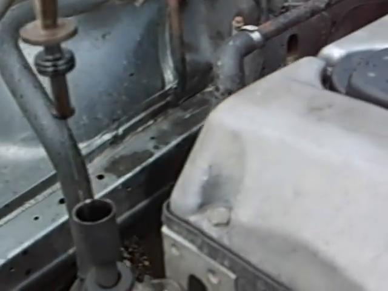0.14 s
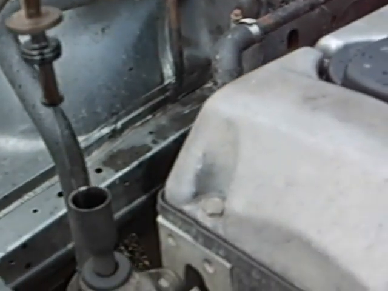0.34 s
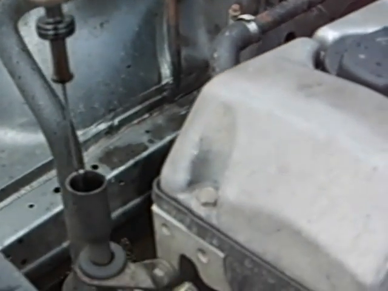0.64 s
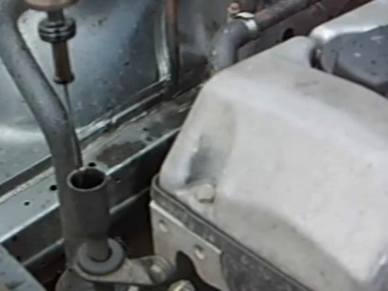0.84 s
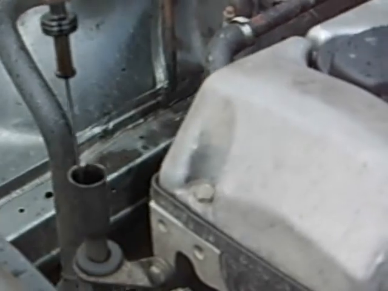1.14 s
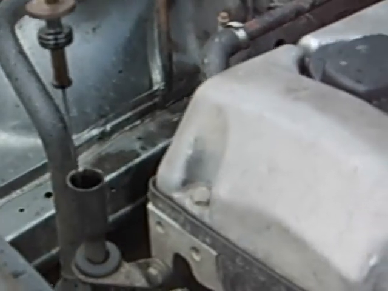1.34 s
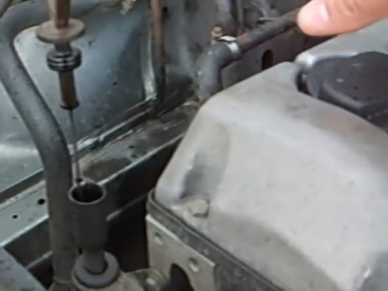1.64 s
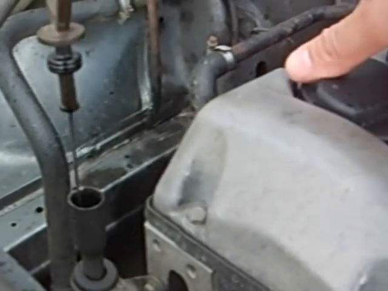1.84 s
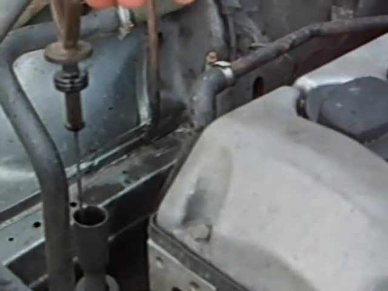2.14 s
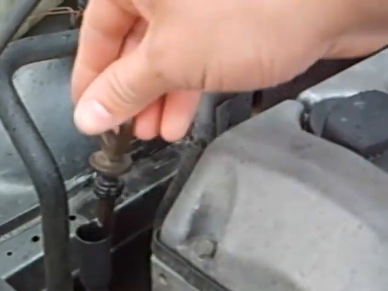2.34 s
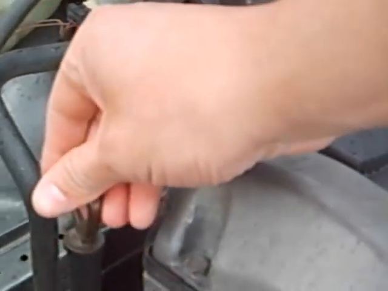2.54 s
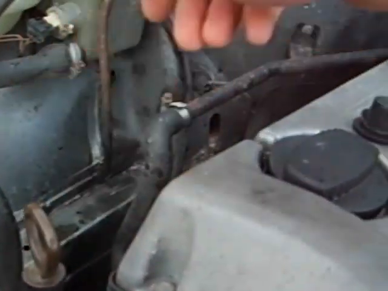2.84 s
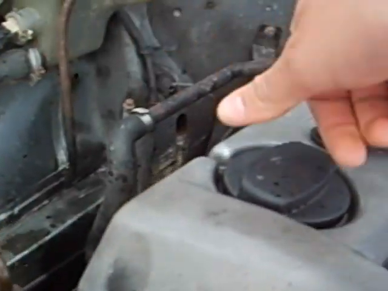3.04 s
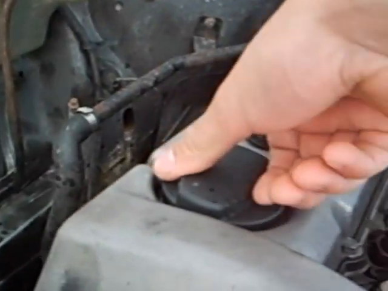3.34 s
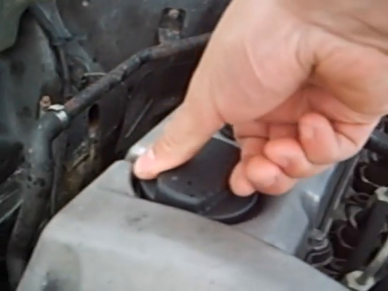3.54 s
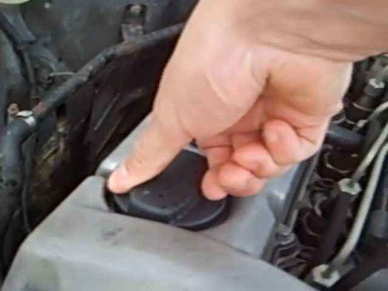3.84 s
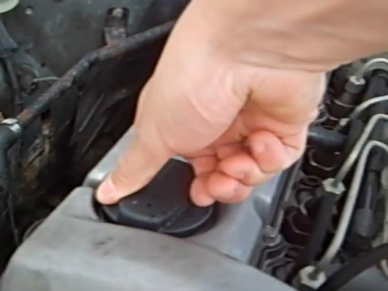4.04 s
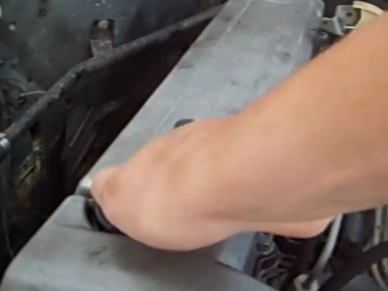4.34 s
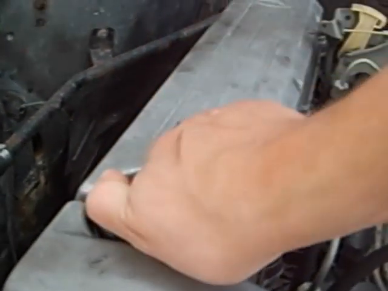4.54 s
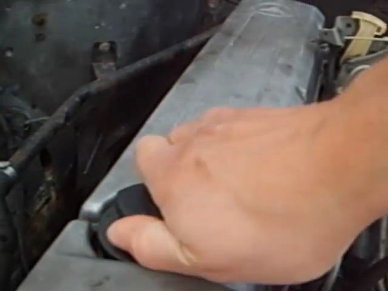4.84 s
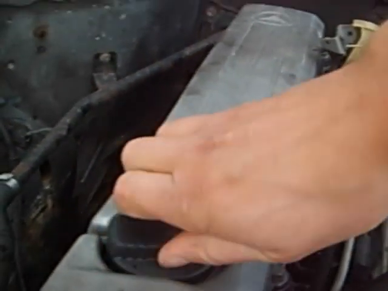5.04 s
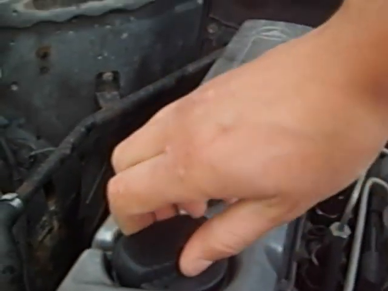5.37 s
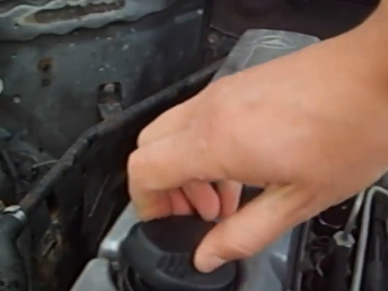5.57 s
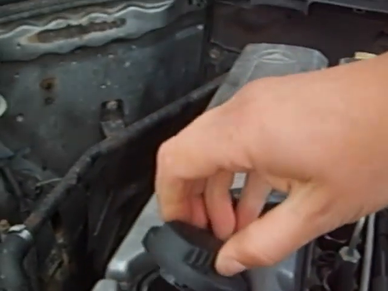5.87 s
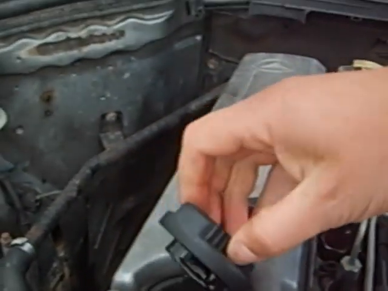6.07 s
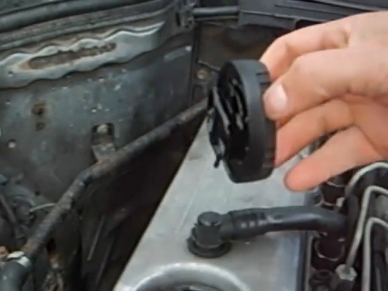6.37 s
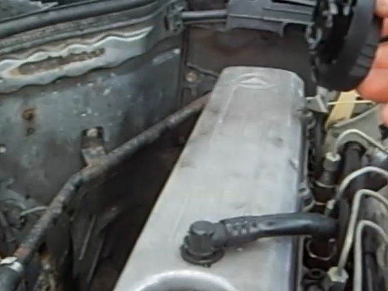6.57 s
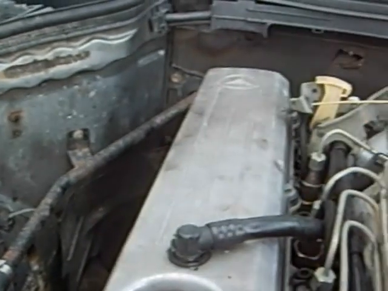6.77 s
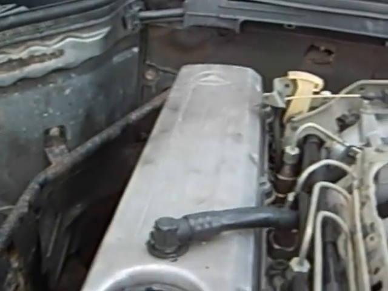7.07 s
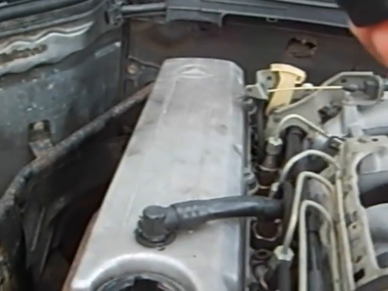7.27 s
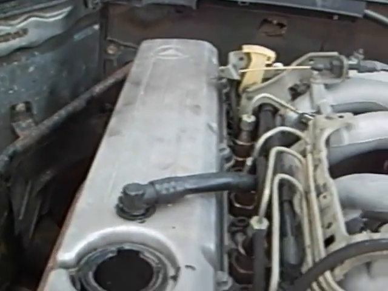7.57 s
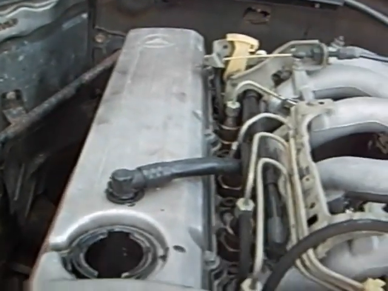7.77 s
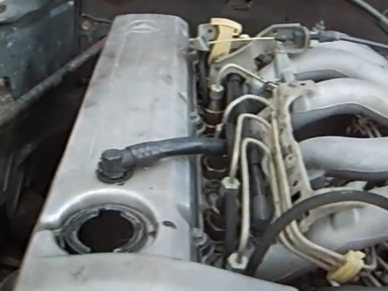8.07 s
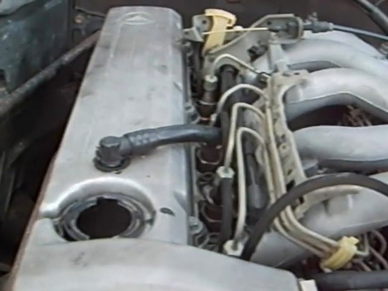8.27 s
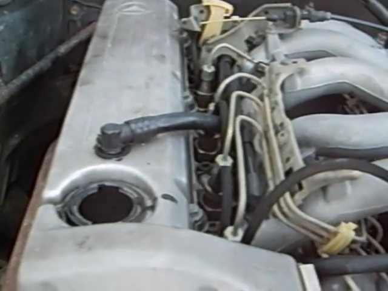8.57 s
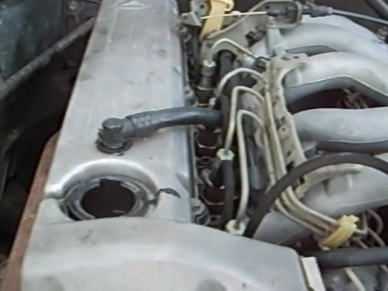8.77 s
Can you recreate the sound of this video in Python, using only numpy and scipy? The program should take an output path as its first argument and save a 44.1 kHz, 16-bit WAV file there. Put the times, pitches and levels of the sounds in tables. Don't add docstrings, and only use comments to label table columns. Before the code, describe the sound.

Close and dry in an open engine bay, a five-cylinder diesel starts at high speed. A first throttle blip swells to a peak near 0.35 s, sags, and a shorter second one peaks around 1.0 s: a loud, dense roar with metallic clatter, bright sizzle and overload grit. From about 1.2 to 2.7 s it runs down without fuel, pitch sliding steadily lower and noise thinning into separate pulses. Gritty steel scrapes of a dipstick come at 2.2-2.5 s, with a seating scrape at 2.6 s. At 2.75 s the engine catches, dips slow with one weak firing, then steadies near 28 firings a second by 3.5 s. Crisp uneven cracks, ticking valves, piston knock and low block throb continue to about 9 s. Around 4.4 s a narrow hollow hum grows as the hand turns the cap; after 6.3 s the cap is off and the cylinder balance shifts slightly. Fan air rumbles softly throughout.

```python
import sys
import numpy as np
from scipy import signal
from scipy.fft import rfft, irfft, next_fast_len
from scipy.io import wavfile
from scipy.ndimage import uniform_filter1d

SR = 44100
rng = np.random.default_rng(int(sys.argv[2]) if len(sys.argv) > 2 else 0)


def volts(x):
    e = np.asarray(x, float) / 20
    return 10 ** e


def to_wav(sig):
    pcm = np.clip(np.atleast_2d(sig), -1, 1) * 32767
    pcm = np.round(pcm).astype(np.int16)
    wavfile.write(sys.argv[1], SR, pcm.T)


N = 392931
CYLINDERS = 5
CATCH_S = 2.7507
IDLE_RATE = 28.0205


def unit(x):
    return x / np.sqrt(np.mean(x ** 2) + 1e-20)


def along(points, hz):
    f, v = np.transpose(points)
    return np.interp(np.log(hz + 1), np.log(f + 1), v)


def curves(rows):
    s, *cols = np.transpose(rows)
    return np.array([np.interp(np.arange(N) / SR, s, c) for c in cols])


def by_speed(rows, rate):
    speed, *cols = np.transpose(rows)
    return np.array([np.interp(rate, speed, c) for c in cols])


def ramp(start_s, length_s):
    return np.clip((np.arange(N) / SR - start_s) / length_s, 0, 1)


def wobble(rate):
    knots = rng.standard_normal(int(N * rate / SR) + 2)
    return np.interp(np.arange(N) * rate / SR, np.arange(len(knots)), knots)


def filtered(x, response):
    m = next_fast_len(N + 8192)
    return irfft(rfft(x, m) * response(np.fft.rfftfreq(m, 1 / SR)), m)[..., :N]


def scatter(starts, sounds):
    where = starts[:, None] + np.arange(sounds.shape[1])
    return np.bincount(where.ravel(), sounds.ravel(), N + SR)[:N]


# start_s, firings_per_s
CRANK_SPEED = [(0, 114.6), (.13, 109.5), (.31, 133.5), (.38, 135.3), (.6, 120.3), (.72, 114.5),
               (.86, 108.8), (1.02, 129.6), (1.16, 121.4), (1.5, 100.3), (1.95, 77.6), (2.42, 52.25),
               (2.75, 35.5)]


def crank():
    after = np.arange(N) / SR - CATCH_S
    swing = 11.505 * np.exp(-np.abs(after) / .2541) * np.cos(2 * np.pi * .61426 * after + .8388)
    free = uniform_filter1d(curves(CRANK_SPEED)[0], size=1323)
    rate = np.where(after < 0, free, IDLE_RATE + swing)
    count = np.cumsum(rate) / SR
    return rate, count - count[round(CATCH_S * SR)]


def firings(count, every=1, late=0):
    number = np.arange(np.ceil(count[0] / every), (count[-1] - late) // every + 1).astype(int)
    return np.interp(number * every + late, count, np.arange(N)).astype(int), number


# open_s, held_s
BLIPS = [
    (.02, 0.34),
    (.77, 0.22),
]


def throttle():
    return sum(ramp(s, .032) - ramp(s + held, .09) for s, held in BLIPS)


# pitch_hz, t60_s, level_db
HEAD_MODES = [(6050, .036, 0), (6500, .03, -3), (7000, .03, -1), (7500, .03, -1), (8250, .028, -2),
              (8900, .025, -2), (9430, .028, -1), (10200, .028, -1), (11800, .025, -4)]
# freq_hz, level_db (per Hz)
CRACK_COLOUR = [(2500, -54), (3600, -28), (4300, -13), (5500, -6.5), (5950, -6), (7500, -4), (9000, -4),
                (10400, -9), (10800, -12), (11900, -16.5), (12600, -15), (13600, -33), (14400, -62),
                (15000, -120)]


def combustion(count, free_db, idle_db):
    at, number = firings(count)
    cylinder = number % CYLINDERS
    t = np.arange(SR // 25) / SR
    luck = rng.standard_normal((len(at), 3 + 2 * len(HEAD_MODES)))
    misfire_db = -14 * (number == 2)
    db = np.where(count[at] < -.5, free_db[at], idle_db[cylinder, at] + misfire_db) + .5 * luck[:, 0]

    burn_s = .0055 * volts(1.5 * luck[:, 1:2])
    bay_answer = .4 * volts(-60 * t / .07)
    shape = (1 - np.exp(-t / .0011)) * (np.exp(-(t / burn_s) ** 2) + bay_answer)
    bursts = volts(2.7 * unit(uniform_filter1d(rng.standard_normal((len(at), len(t))), size=30)))
    sound = shape * bursts * rng.standard_normal(bursts.shape)

    own_db = 1.5 * rng.standard_normal((CYLINDERS, len(HEAD_MODES)))
    for k, (hz, t60, mode_db) in enumerate(HEAD_MODES):
        level = volts(mode_db - 2 + own_db[cylinder, k] + 2.5 * luck[:, 3 + 2 * k])[:, None]
        pitch = hz * (1 + .011 * luck[:, 4 + 2 * k])[:, None]
        ring = np.sin(2 * np.pi * pitch * t) * volts(-60 * t / t60)
        sound += level * ring * (1 - np.exp(-t / .0016))
    sound /= np.sqrt(np.mean(sound[:, :420] ** 2, axis=1, keepdims=True))

    early_or_late_s = .0004 * luck[:, 2] - .0006
    start = np.maximum(at + (SR * early_or_late_s).astype(int), 0)
    cracks = scatter(start, volts(db + 2)[:, None] * sound)
    return filtered(cracks, lambda hz: volts(along(CRACK_COLOUR, hz)))


# firings_per_s, order_1_db, order_2_db, order_3_db, order_4_db (rms)
PIPES = [(28, -60, -58, -58.5, -63.5), (43, -46, -44, -53, -56), (52.4, -44, -52, -37, -48),
         (64, -46, -44, -40, -41), (77.6, -39, -45, -31.5, -47), (90, -41, -34.5, -33.5, -36),
         (96, -54, -36, -47, -55), (102.3, -39, -28, -50, -46), (110, -43, -20, -47, -29),
         (123.4, -38, -29, -29.5, -26.5), (128, -39, -22.5, -29.5, -24), (136, -48, -22, -31, -39)]
BLIP_ORDERS_DB = (6, -1, 1, -2)
# freq_hz, level_db (rms of an order)
BAY_COLOUR = [(140, -55), (200, -52), (280, -52), (400, -55), (490, -47.5), (560, -44), (600, -49),
              (700, -54)]


def order_levels(rate, boom_db, gap_hz):
    bay_orders = range(5, 26)
    pipe_db = by_speed(PIPES, rate) + np.outer(BLIP_ORDERS_DB, throttle())
    quiet_db = -30 * (1 - ramp(2.88, .41))
    gap_db = 14 * ramp(4.35, .33)
    bay_db = []
    for hz in IDLE_RATE * np.array(bay_orders):
        boom = boom_db / (1 + (250 / hz) ** 2)
        gap = gap_db / (1 + (2 * (hz - gap_hz) / 24) ** 2)
        bay_db.append(along(BAY_COLOUR, hz) + boom + quiet_db + 2 * wobble(1.23) + gap)
    return [*zip(range(1, 1 + len(pipe_db)), pipe_db), *zip(bay_orders, bay_db)]


# freq_hz, level_db (per Hz)
BLOCK_COLOUR = [(40, -45), (70, -18), (115, -17), (160, -10.5), (240, -12), (330, -7), (420, -6), (560, -5),
                (780, -6.5), (1100, -6), (1500, -42)]


def block(rate, count, thud_db, orders):
    at, number = firings(count)
    t = np.arange(SR // 8) / SR
    answer = rng.standard_normal((CYLINDERS, len(t)))
    answer -= .6 * answer.mean(0)
    answer *= (1 - np.exp(-(t / .0074) ** 2)) * volts(-60 * t / .22)
    kicks = np.zeros((CYLINDERS, N))
    kicks[number % CYLINDERS, at] = volts(.86 * rng.standard_normal(len(at))) / np.sqrt(rate[at])
    thud = unit(signal.oaconvolve(kicks * np.sqrt(28), answer, axes=1)[:, :N].sum(0))
    loose = .59 * rng.standard_normal(N) * volts(2.8 * np.cos(2 * np.pi * (count - .45)))
    total = volts(thud_db + .5) * unit(filtered(thud + loose, lambda hz: volts(along(BLOCK_COLOUR, hz))))
    for k, db in orders:
        level = np.sqrt(2) * volts(db + 1 + wobble(12))
        waver = rng.normal(0, 11 / k) + .25 * wobble(2)
        total = total + level * np.cos(2 * np.pi * k * (count - .37) + waver)
    return total


# freq_hz, level_db (per Hz)
GEAR_FAST = [(180, -38), (300, -5), (700, -4.5), (1200, -2.5), (1940, -4.5), (2630, -6), (5560, -7.5),
             (9270, -15), (11000, -26.5), (13600, -42)]
GEAR_IDLE = [(180, -38), (300, -11), (550, -4), (807, -3), (1430, 5), (1850, 1), (3620, -4), (5650, -3.5),
             (6120, -3.5), (8030, -9.5), (9730, -14), (12600, -32), (13600, -33)]
# pitch_hz, width_hz, level_db
COVER_FAST = [(478, 80, -3), (614, 50, 2), (752, 60, 1), (1230, 250, -13), (1910, 110, -2.5),
              (5740, 540, -14.5), (7190, 200, -3)]
COVER_IDLE = [(574, 80, -6), (1440, 110, -16), (2243, 20, -8), (3400, 69, -31)]


def gear(rate, count, clatter_db, sizzle_db):
    fast = np.clip((rate - 32) / 30, 0, 1)
    turn = (count % 1) * (1 - .67 * fast)

    def grit(shake_db):
        uneven_db = .5 * wobble(900) + .3 * wobble(6.7) + .93 * wobble(90)
        return rng.standard_normal(N) * volts(uneven_db - shake_db * turn)

    def colour(spectrum, peaks, hz):
        bumps = sum(volts(db) / (1 + (2 * (hz - c) / w) ** 2) for c, w, db in peaks)
        band = (hz < 13700) / (1 + (650 / (hz + 1)) ** 3)
        return volts(along(spectrum, hz)) * (1 + 1.55 * bumps) * band

    def high(hz):
        return 1 / (1 + (4000 / (hz + 1)) ** 6)

    heavy, light = grit(shake_db=5), grit(shake_db=7.5)
    total = 0
    for share, spectrum, peaks in ((fast, GEAR_FAST, COVER_FAST), (1 - fast, GEAR_IDLE, COVER_IDLE)):
        clatter = unit(filtered(heavy, lambda hz: colour(spectrum, peaks, hz) * np.sqrt(1 - high(hz))))
        sizzle = unit(filtered(light, lambda hz: colour(spectrum, peaks, hz) * np.sqrt(high(hz))))
        total = total + np.sqrt(share) * (volts(clatter_db + 2.5) * clatter + volts(sizzle_db) * sizzle)
    return total


def knocks(at, hz, ring_db, tick_db, t60, spread=.014):
    t = np.arange(SR // 30) / SR
    luck = rng.standard_normal((len(at), 3))
    pitch = (hz * (1 + spread * luck[:, 0]))[:, None]
    ring = np.sin(2 * np.pi * pitch * t) * volts(-60 * t / t60) * (1 - np.exp(-t / .001))
    tick = rng.standard_normal(ring.shape) * volts(-60 * t / .016)
    ring_level = volts(ring_db + 1.7 * luck[:, 1])[:, None]
    tick_level = volts(tick_db + 2 * luck[:, 2])[:, None]
    return scatter(at, ring_level * ring + tick_level * tick)


SLAP_HZ = (1510, 1416, 1318, 1673, 1447)
# late_firings (after the first cylinder), ring_hz, ring_db, tick_db
VALVES = [(.5, 7000, -60, -13.5), (1.25, 2240, -19.5, -33), (1.6, 5470, -20.5, -27),
          (2.302, 3400, -27, -34), (2.351, 5130, -25.5, -14.5), (2.5, 2240, -25.5, -11.5),
          (3.502, 4800, -31, -43), (3.871, 2310, -27, -36), (3.868, 4230, -27, -45),
          (4.101, 4100, -53, -17), (4.5, 4850, -25.5, -44)]


def valves(rate, count, clatter_db, slap_db):
    gain_db = clatter_db + 29.5 - 9 * np.log10(rate / 28)
    at, number = firings(count)
    slap_hz = np.take(SLAP_HZ, number % CYLINDERS)
    total = knocks(at, slap_hz, gain_db[at] + slap_db[at], -60, t60=.036, spread=.053)
    for late, hz, ring_db, tick_db in VALVES:
        at, _ = firings(count, CYLINDERS, late)
        total += knocks(at, hz, gain_db[at] + ring_db, gain_db[at] + tick_db, t60=.038)
    colour = [(500, -49), (1000, -3.5), (7000, -1.0), (11000, -18), (13500, -38)]
    return filtered(total, lambda hz: volts(along(colour, hz)))


# freq_hz, level_db (per Hz)
AIR_COLOUR = [(8, -20), (25, -14), (60, -6), (120, -4), (300, -64)]


def draught(rate):
    air = unit(filtered(rng.standard_normal(N), lambda hz: volts(along(AIR_COLOUR, hz))))
    return volts(-56 + 6.5 * np.log10(rate / 28) + 4.5 * wobble(11)) * air


# start_s, peak_db
DIPSTICK = [
    (2.2054, 5),
    (2.2857, 1),
    (2.3094, -3),
    (2.356, -6),
    (2.3734, -1),
    (2.4503, -8),
    (2.4713, -8),
    (2.4894, -11),
    (2.615, 0),
]


def dipstick():
    s, db = np.transpose(DIPSTICK)
    t = np.arange(SR // 25) / SR
    scrape = rng.standard_normal((len(s), len(t))) * (1 - np.exp(-t / .0014)) * volts(-60 * t / .049)
    scrapes = scatter((s * SR).astype(int), volts(db - 2)[:, None] * scrape)
    colour = [(1200, -42), (2500, -4.5), (3500, .5), (5000, -9), (8000, -9), (12000, -50)]
    return filtered(scrapes, lambda hz: volts(along(colour, hz)))


CAPPED_DB = (-8.5, -11.5, -12, -12, -8.5)
UNCAPPED_DB = (-7.5, -11, -9.5, -12.5, -10.5)
FRONT_DB = (1, 0.5, -2.5, -1, -1.5)


def idle_cracks(near_db):
    cap_off = ramp(6.35, .8)
    leaning = ramp(2.8, .42) - ramp(3.9, .42)
    cap_db = np.outer(CAPPED_DB, 1 - cap_off) + np.outer(UNCAPPED_DB, cap_off)
    return near_db + cap_db + np.outer(FRONT_DB, leaning)


# firings_per_s, thud_db,
# clatter_db, sizzle_db, crack_db
SPEED = [(36.4, -29.5, -32, -28, -25), (50, -28.5, -27, -25, -24), (70, -27.5, -23, -20, -19.5),
         (92, -22, -17.5, -16, -16), (107.5, -21.5, -14.5, -14, -16), (121, -18.5, -13, -11.5, -17.5),
         (137, -17.5, -13, -12.5, -21)]
# start_s, near_db (to the head), boom_db (of the bay), gap_hz (under the hand),
# bores_db (view of the bores)
MIC = [(2.75, -3, -4, 337, -33), (3.1, 0.5, 4, 335, -12.5), (3.4, 2.5, -8, 335, -14),
       (4.25, 1, -9, 340, -20), (4.6, 0, -2.5, 330, -19), (5.4, 0.5, 2, 333, -25), (5.75, 1.5, 2, 359, -17),
       (6.15, -1, 1, 360, -19), (6.4, -4, 0.5, 364, -25), (7, -2.5, -1, 366, -34), (7.3, -2, -6, 341, -27),
       (8.2, -1.5, -5.5, 345, -47), (8.7, -2.5, -1, 346, -28), (8.91, -1.5, -2, 345, -14)]


def scene():
    rate, count = crank()
    thud_db, clatter_db, sizzle_db, free_db = by_speed(SPEED, rate)
    near_db, boom_db, gap_hz, bores_db = curves(MIC)
    idle = ramp(CATCH_S, .16)

    def blend(free, governed):
        return free + idle * (governed - free)

    thud_db = blend(thud_db, -33.5 + .18 * boom_db)
    clatter_db = blend(clatter_db, -29 - 1.5 * (1 - ramp(2.7, .35)))
    sizzle_db = blend(sizzle_db, -28.5 + .74 * near_db)
    slap_db = blend(-21.5, bores_db)
    fuelled_db = free_db + 10 * throttle()
    engine = combustion(count, fuelled_db, idle_cracks(near_db))
    engine = engine + block(rate, count, thud_db, order_levels(rate, boom_db, gap_hz))
    engine = engine + gear(rate, count, clatter_db, sizzle_db)
    engine = engine + valves(rate, count, clatter_db, slap_db)
    return (engine + draught(rate) + dipstick())[None]


def band_limit(x):
    return signal.sosfilt(signal.butter(12, 15620, fs=SR, output="sos"), x)


def record(dry):
    heard = filtered(dry, lambda hz: hz < 14000)
    clipped = heard / (1 + np.abs(heard / .92) ** 14) ** (1 / 14)
    dulled = filtered(clipped, lambda hz: volts(along([(12000, 0), (14500, -7.5)], hz)))
    return band_limit(np.clip(dulled, -1, 1))


dry = scene()
out = record(dry)
to_wav(out)
```